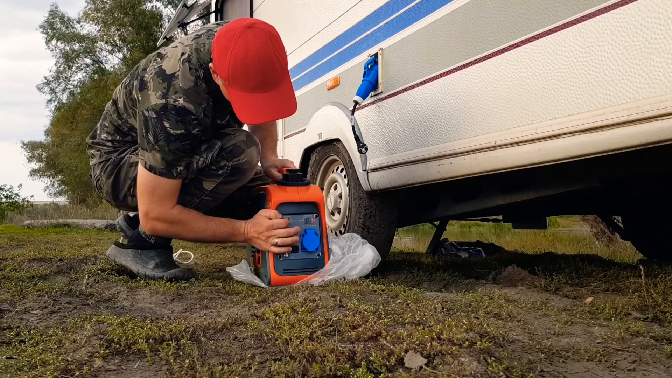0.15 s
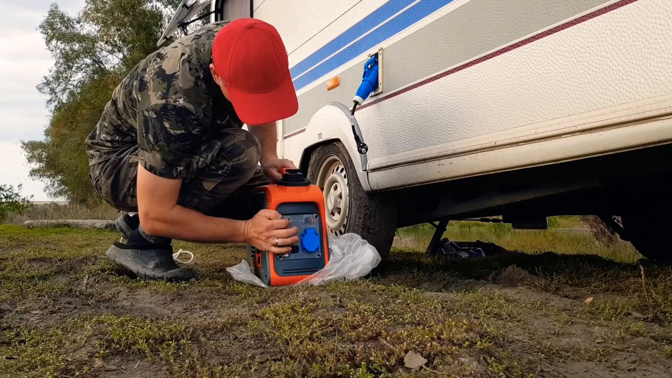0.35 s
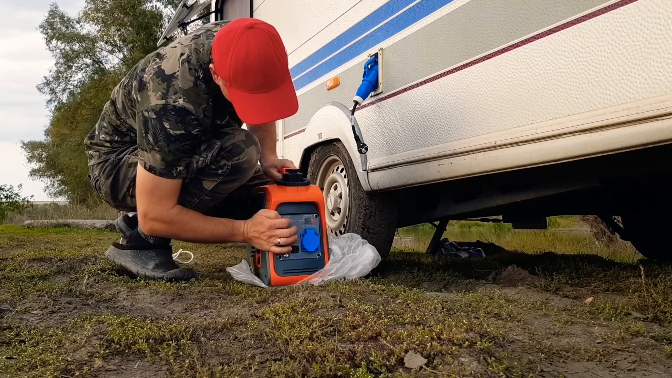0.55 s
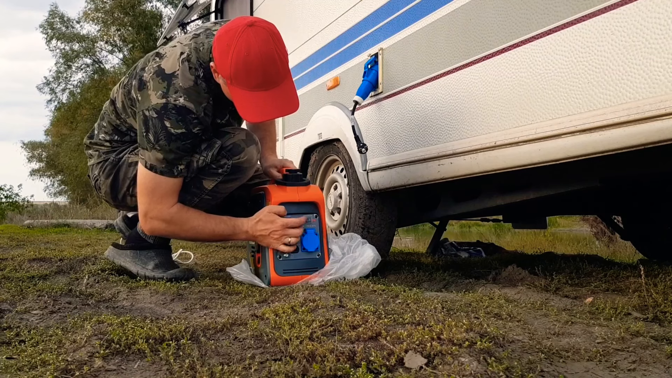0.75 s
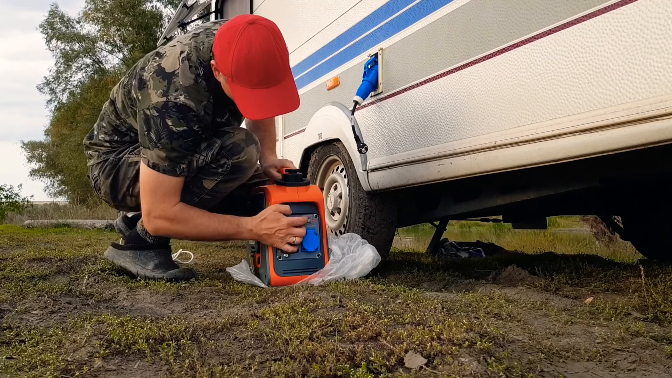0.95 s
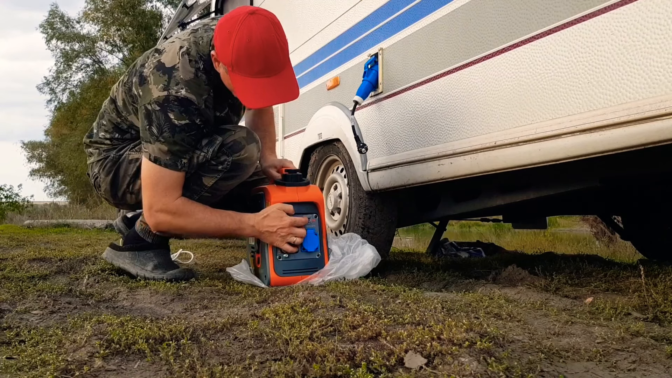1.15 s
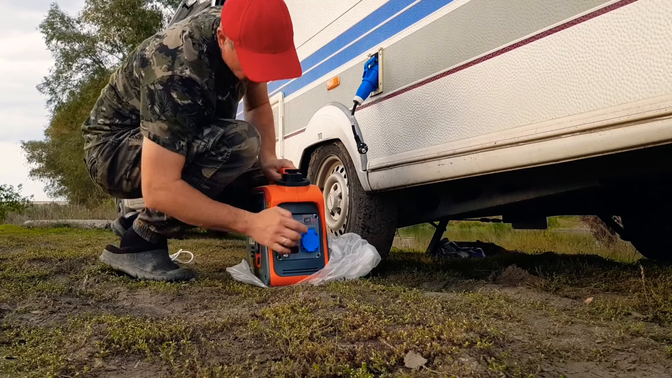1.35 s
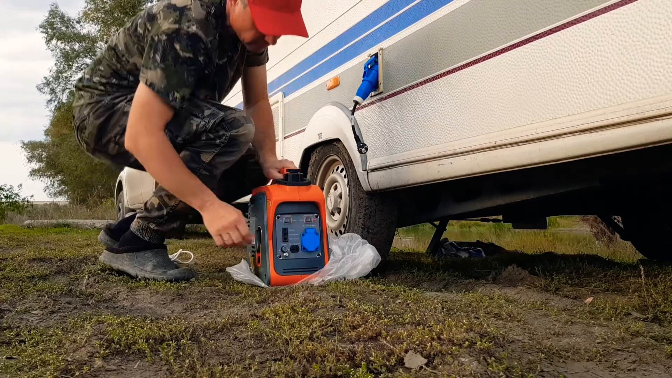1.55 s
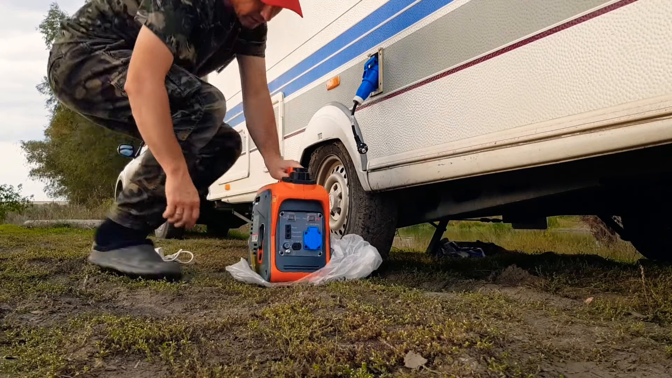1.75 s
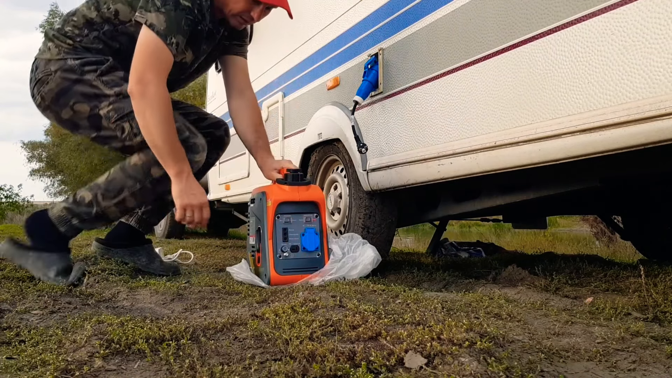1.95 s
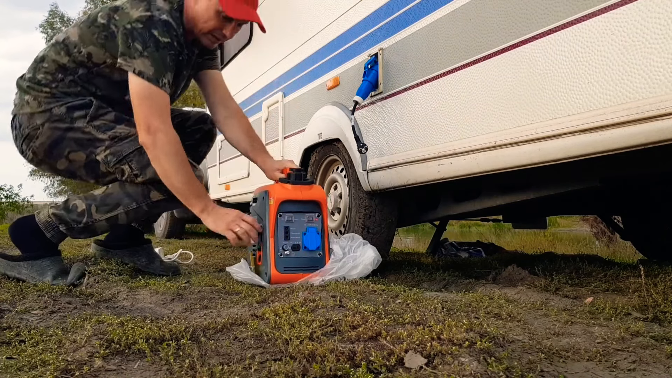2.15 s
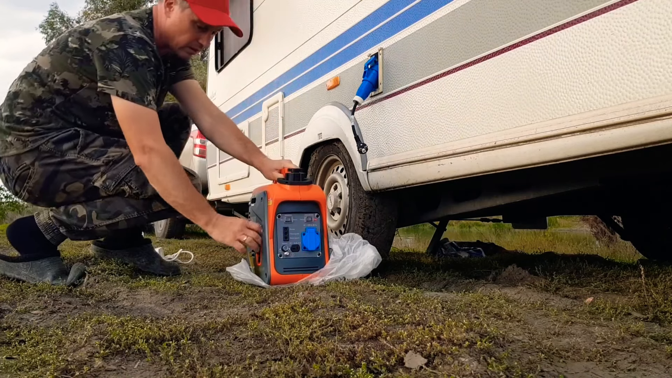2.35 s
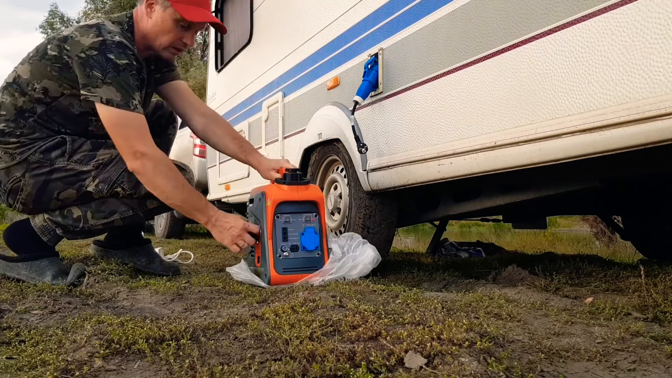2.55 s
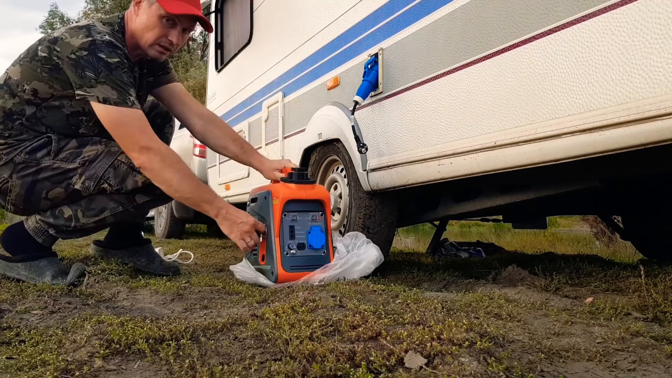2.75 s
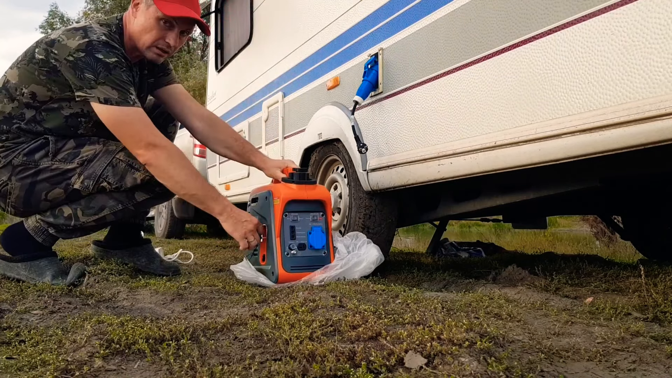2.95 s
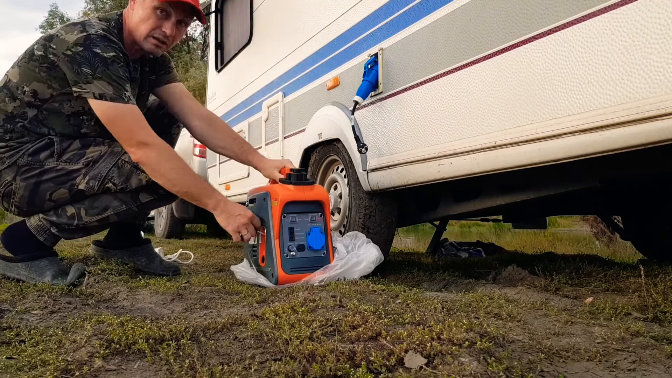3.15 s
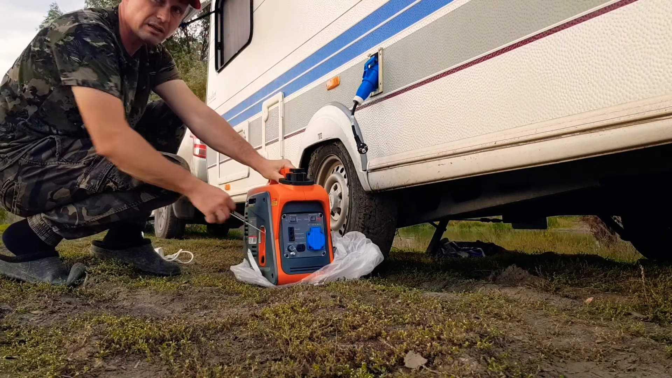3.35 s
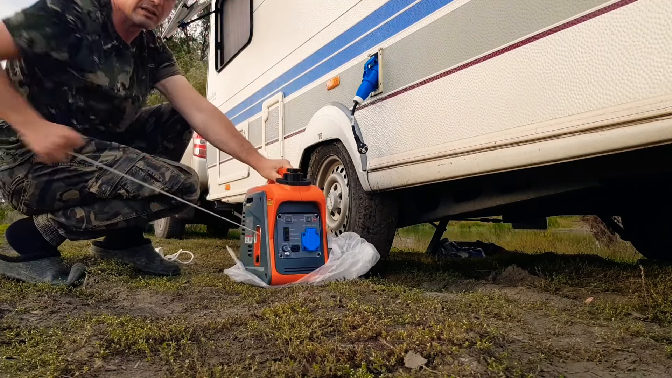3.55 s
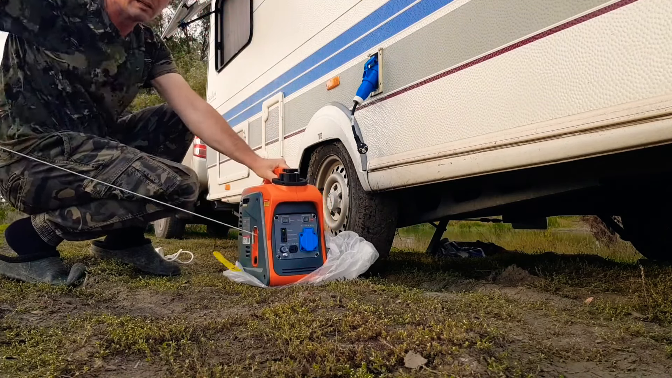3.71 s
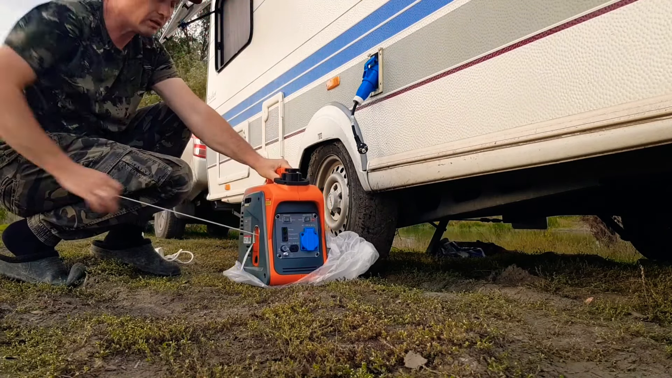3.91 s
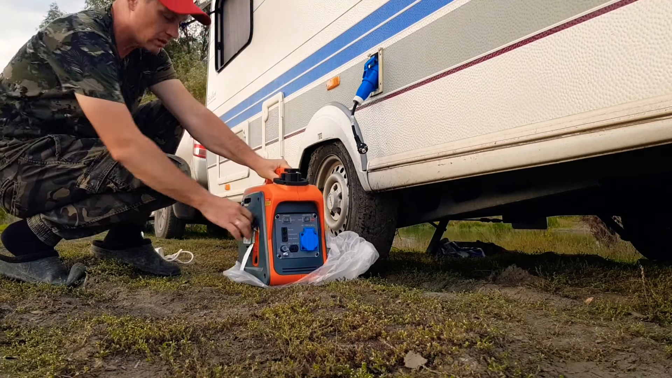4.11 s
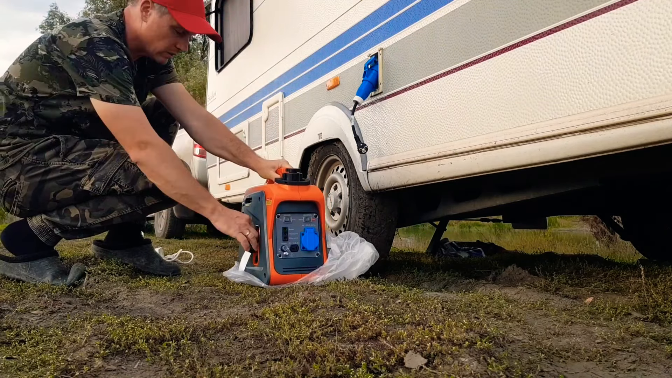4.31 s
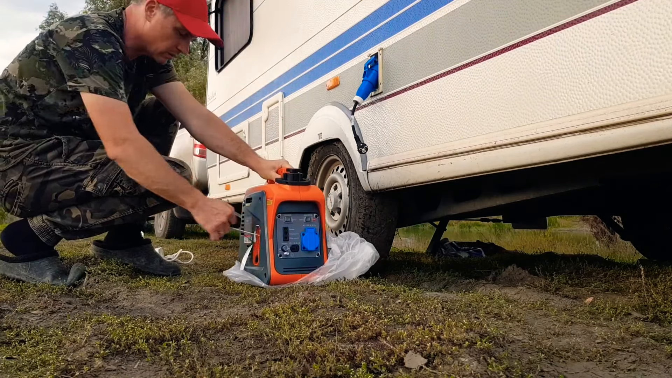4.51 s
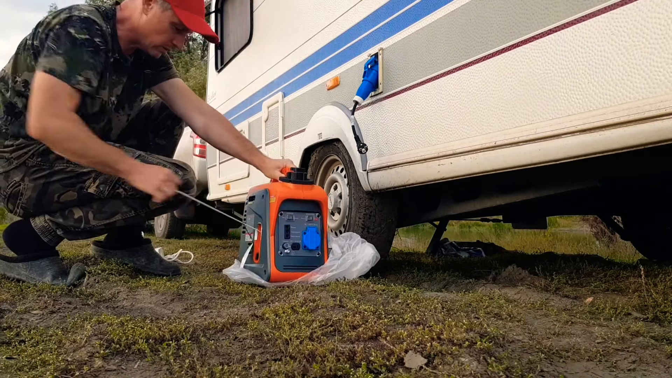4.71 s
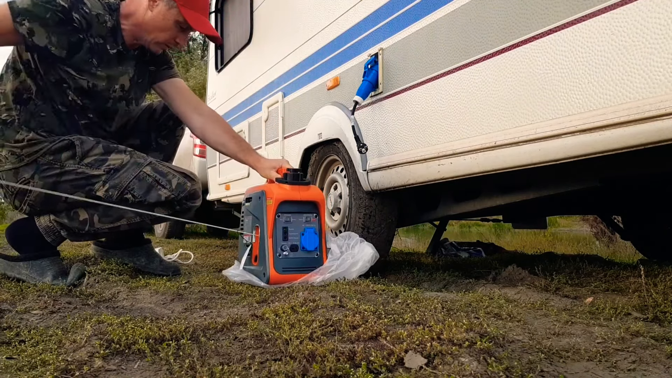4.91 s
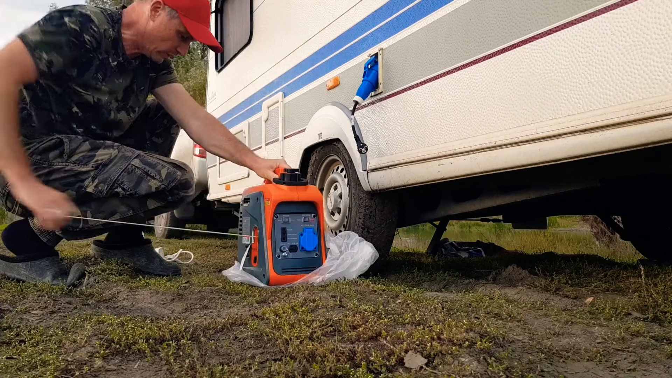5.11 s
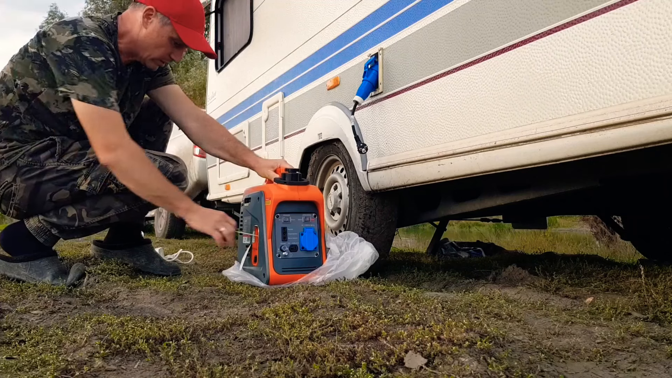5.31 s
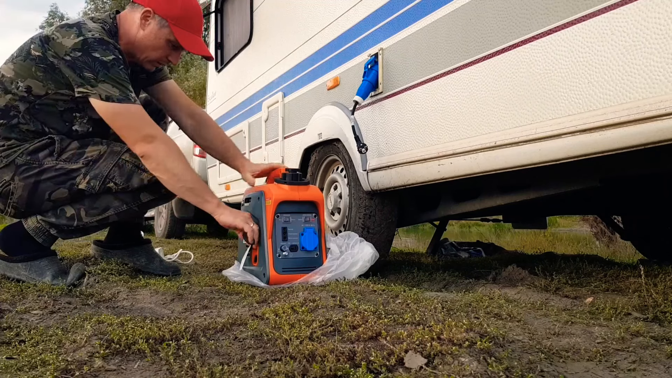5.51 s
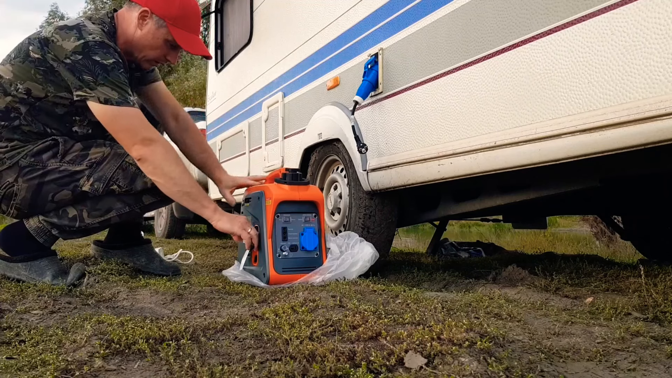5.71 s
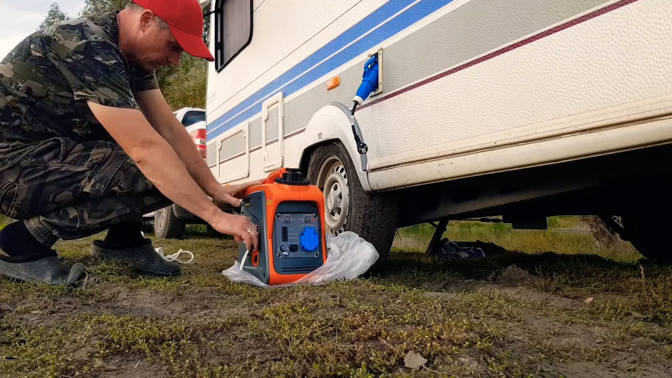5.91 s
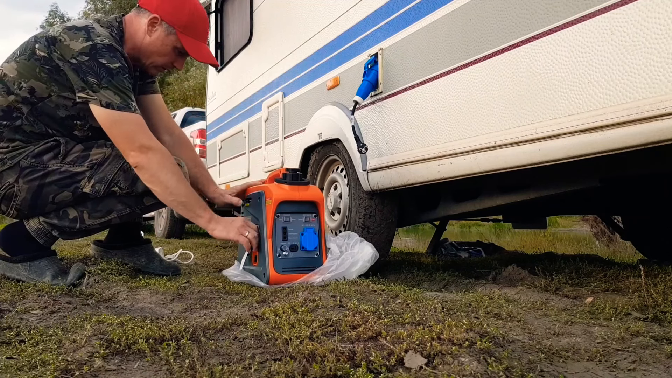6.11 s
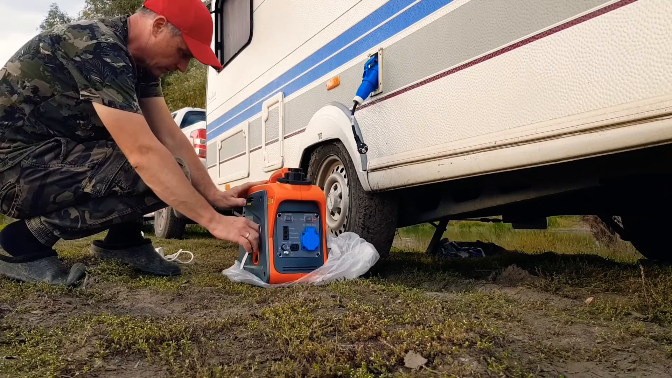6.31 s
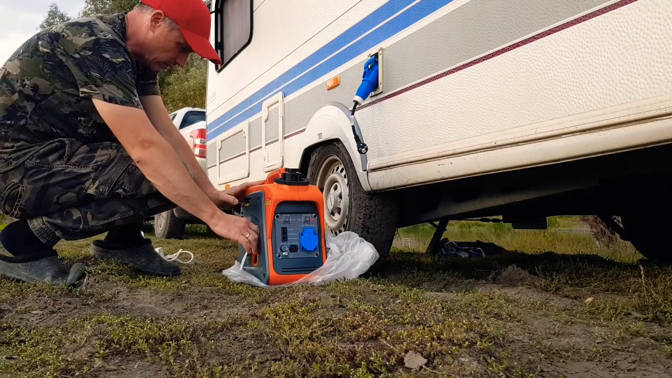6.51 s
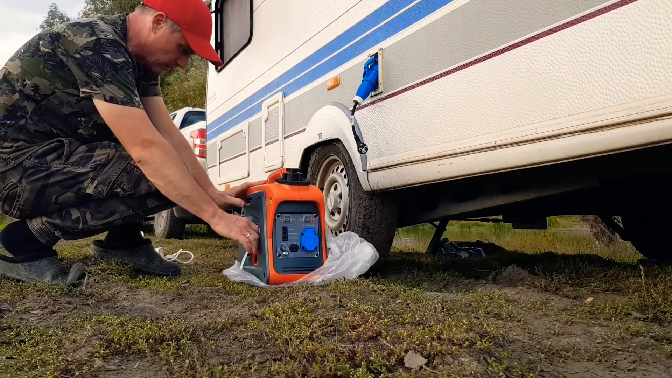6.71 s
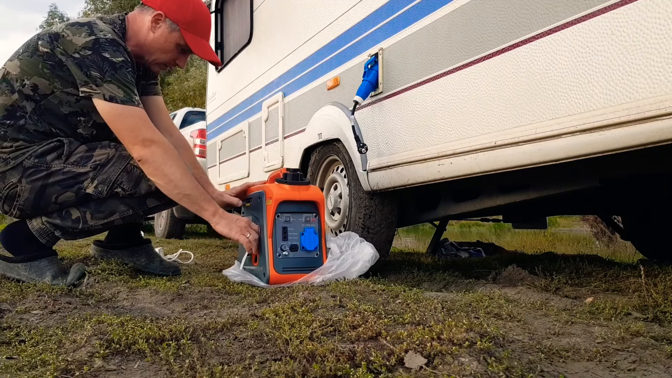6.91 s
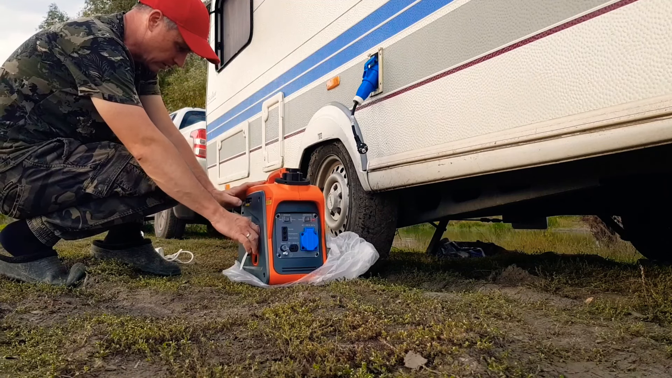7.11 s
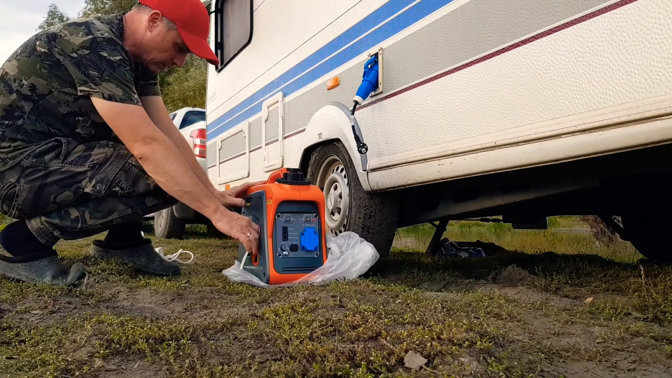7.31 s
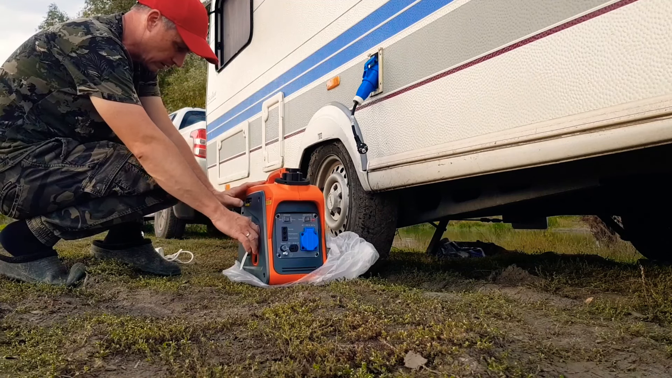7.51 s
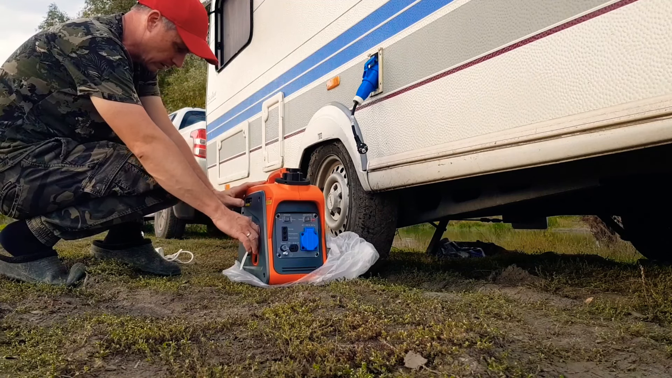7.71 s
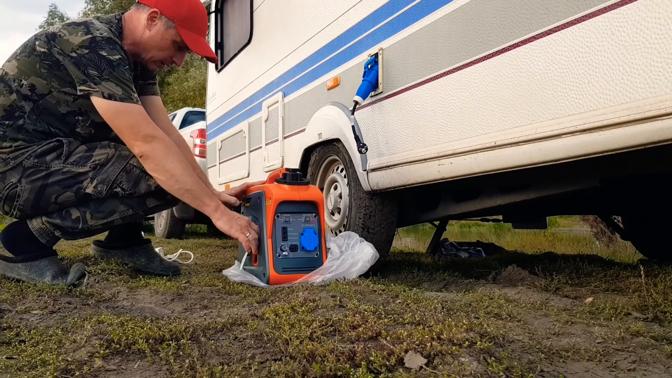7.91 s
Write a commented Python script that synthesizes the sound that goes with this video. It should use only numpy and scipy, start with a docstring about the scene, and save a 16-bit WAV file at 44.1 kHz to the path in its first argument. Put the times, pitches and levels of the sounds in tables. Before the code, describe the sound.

Outdoors beside a caravan, a quiet switch click, clothing rustle and boots scuffing grass lead to handle knocks on a plastic casing. Two hard pulls of a starter cord follow, each a rasping, clattering burst with a whirring rise, falling whine and low engine thuds. The engine does not fire. Afterwards come a knob clack and tiny squeaks. Close stereo, mostly on the right, with little echo.

```python
"""A small plastic-cased generator on grass beside a caravan is pulled twice by its recoil starter and never fires.
Rope hisses as filtered friction clicks, reel and flywheel whine at speed-following pitches, gear chatters as clumped
clicks, and the engine thuds as low noise. A man clicks the switch as a struck casing, rustles his clothes and scuffs
the grass; a knob clacks and thin gliding squeaks follow. Low rumble and faint narrow-band drones lie under it all.
Two microphones hear the scene mostly on the right."""
import sys
import numpy as np
from scipy import signal
from scipy.fft import rfft, irfft
from scipy.io import wavfile

SR = 44100
rng = np.random.default_rng(int(sys.argv[2]) if len(sys.argv) > 2 else 0)


def store_wav(level_fs):
    """Save 16-bit WAV to argv[1]."""
    pcm = np.round(np.clip(np.atleast_2d(level_fs), -1, 1) * 32767)
    wavfile.write(sys.argv[1], SR, pcm.T.astype(np.int16))


N = 350815
TIME = np.arange(N) / SR   # s
# All levels in dB are relative: scene() balances the sources afterwards.


def from_db(db):
    """Logarithmic level: decibels become an amplitude gain."""
    return 10 ** (np.asarray(db) / 20)


def rms_one(x):
    """Normalisation: scale a signal to rms 1."""
    return x / np.sqrt(np.mean(x ** 2) + 1e-20)


def drift(rate):
    """Random modulation: straight lines join random values of spread 1, drawn rate times a second."""
    knots = rng.standard_normal(16000)
    return np.interp(TIME * rate, np.arange(len(knots)), knots) * np.sqrt(3 / 2)


def colour(x, points, tilt_db=0):
    """Minimum-phase filtering through (Hz, dB) points, tilted in dB per octave about 1 kHz."""
    size = 8192
    bin_hz = np.arange(size // 2 + 1) * SR / size
    octave = np.log2(np.maximum(bin_hz, 10) / 1000)
    hz, db = np.transpose(points)
    db = np.interp(octave, np.log2(hz / 1000), db) + tilt_db * np.clip(octave, -1, 3)
    # folding the cepstrum onto positive times makes the filter causal
    cepstrum = irfft(np.log(from_db(db)))
    cepstrum[1:size // 2] *= 2
    cepstrum[size // 2 + 1:] = 0
    response = irfft(np.exp(rfft(cepstrum)))
    return signal.oaconvolve(x, response)[:len(x)]


def noise(points):
    """Spectral shaping: white noise is coloured and set to rms 1."""
    return rms_one(colour(rng.standard_normal(N), points))


def grains(per_s, spread_db):
    """Shot noise: clicks of uneven size and random sign at random times."""
    excess = np.minimum(rng.exponential(1, N), 4)
    sizes = from_db(spread_db * excess) * rng.choice([-1, 1], N)
    return sizes * (rng.random(N) < per_s / SR)


def ringing(x, modes):
    """Modal resonance: a part rings in parallel two-pole resonators of alternating sign."""
    out = 0
    for k, (hz, width, db) in enumerate(modes):
        r = np.exp(-np.pi * width / SR)
        poles = [1, -2 * r * np.cos(2 * np.pi * hz / SR), r * r]
        mode = (1 - r * r) / 2 * signal.lfilter([1, 0, -1], poles, x + 1e-18)
        out = out + (-1) ** k * from_db(db) * mode
    return out


def add(track, s, sound):
    """Superposition: mix a sound into the track at a time."""
    start = max(int(round(s * SR)), 0)
    track[start:start + len(sound)] += sound[:N - start]


def swell(peak, rise, fall, shape):
    """Envelope: 1 at the peak, a tenth one rise before and one fall after; shape 1 is pointed, 2 round."""
    away = np.maximum((peak - TIME) / rise, (TIME - peak) / fall)
    return from_db(-20 * np.minimum(away ** shape, 10))


def gate(start, end, fade):
    """Gating: gain 1 between two times, with linear edges."""
    return np.clip(np.minimum(TIME - start, end - TIME) / fade + .5, 0, 1)


def whine(hz, jitter, flutter_db, octave_db):
    """Rotational tone: phase sums the speed, so pitch follows it, a little unsteadily, with an octave above."""
    phase = 2 * np.pi * np.cumsum(hz * (1 + jitter * drift(500))) / SR
    tone = np.sin(phase) + from_db(octave_db) * np.sin(2 * phase)
    return np.sqrt(2) * from_db(flutter_db * drift(120)) * tone


# faint far-off drones: start_s, end_s, pitch_hz, level_db
DRONES = [(0, 0.3, 374, -71.5), (1.35, 1.74, 215.5, -65), (1.7, 4.86, 106.4, -55.5), (2.6, 7.95, 534, -75),
          (7.15, 7.5, 274, -69)]


def drones(width_hz=30.0):
    """Amplitude modulation: a random complex envelope widens each carrier to a narrow band that swells and fades."""
    out = np.zeros(N)
    for start, end, hz, db in DRONES:
        count = int((end - start) * SR)
        envelope = drift(width_hz) + 1j * drift(width_hz)
        tone = np.real(envelope * np.exp(2j * np.pi * hz * TIME))
        add(out, start, from_db(db) * signal.windows.tukey(count) * rms_one(tone)[:count])
    return out


# spells of low rumble while the man moves about: start_s, length_s, level_db
RUMBLES = [(1.387, .1, -56), (1.7, 3.75, -53.5), (1.828, 0.13, -47.5), (2.45, .06, -50), (5.55, .27, -58),
           (7.48, .5, -57.5)]
BREEZE_DB, RUMBLE_FADE_S = -59.5, .05


def rumble_level(gust_db=0.7, gusts_per_s=4.3):
    """Power addition: a slightly gusty breeze, with louder spells on top."""
    breeze = from_db(BREEZE_DB + gust_db * drift(gusts_per_s))
    spells = sum((from_db(db) * gate(start, start + length, RUMBLE_FADE_S)) ** 2
                 for start, length, db in RUMBLES)
    return np.sqrt(breeze ** 2 + spells)


# spectrum of the low rumble: frequency_hz, density_db (per Hz)
RUMBLE_COLOUR = [(20, -25), (35, -7), (52, 3.5), (75, -1), (110, -7.5), (165, -10), (230, -15.5),
                 (400, -23), (700, -32.5), (2000, -50.5), (8000, -77.5)]


def rumble(level):
    """Low-frequency turbulence: fresh low noise follows the given level."""
    return level * noise(RUMBLE_COLOUR)


# spectrum of the steady background hiss: frequency_hz, density_db (per Hz)
AIR_COLOUR = [(50, 2.5), (300, 10), (700, 5), (1200, 3), (2500, -1), (6000, -6), (9000, -11), (12000, -0.5),
              (15500, 1)]


def air():
    """Uncorrelated noise: each channel has its own steady background hiss."""
    return np.array([noise(AIR_COLOUR), noise(AIR_COLOUR)])


# blows on the casing from switch, handle, pawls and piston: start_s, level_db, tilt_db (per octave), thump_db
KNOCKS = [(1.083, -43, 8, -61), (2.243, -58.5, -6, -68), (2.314, -64, -8, -63), (2.523, -40.5, -1, -51),
          (2.552, -42, -1, -48.5), (2.572, -48.5, -13.5, -50), (2.594, -52, -3, -53),
          (3.27, -66.5, 9.5, -80), (3.361, -48.5, -12, -47), (3.557, -34.5, -17, -33.5),
          (3.586, -38, -1, -35), (3.614, -30, -1.5, -37), (3.648, -31, -5.5, -28.5), (3.671, -39, -4, -43),
          (3.799, -38.5, -3, -44), (3.852, -37.5, -3.5, -40.5), (3.869, -38, -8, -43),
          (3.926, -40.5, -3.5, -46), (3.946, -40.5, -2, -60), (4.045, -49, -2, -56), (4.074, -48, 0, -47),
          (4.129, -49, -4.5, -35), (4.136, -35.5, 2, -33.5), (4.146, -34.5, -3.5, -36),
          (4.558, -36, -10.5, -67), (4.775, -40, -12, -50), (4.812, -38.5, -4, -39),
          (4.838, -40.5, -1.5, -38), (4.935, -38.5, -5, -44), (5.118, -34, -11, -37.5),
          (5.13, -36.5, -9, -36.5), (5.186, -41, -12, -55), (5.303, -42, -14, -37.5),
          (5.4, -57, -19, -40.5), (6.092, -36.5, 0.5, -79), (6.485, -56.5, -15, -50.5),
          (7.036, -71.5, 0, -87), (7.394, -65, -16, -48.5)]
# resonances of the casing: frequency_hz, width_hz, level_db
CASING = [(245, 36, -5), (387.4, 62, -3.5), (474, 45, -2.5), (556, 44, 3), (803, 52, -2), (975, 45, -9.5),
          (1226, 110, -9), (1500, 210, -7.5), (1907, 33, -3.5), (2850, 150, -23), (4533, 110, -24.5)]
# spectrum of a blow's contact noise: frequency_hz, density_db (per Hz)
KNOCK_COLOUR = [(120, -24.5), (300, -13.5), (480, 1), (850, 0), (1300, -2.5), (2100, -6.5), (2900, -16.5),
                (4200, -18.5), (6000, -24.5), (9000, -39.5), (15000, -41.5)]
# spectrum of the heavy low thump: frequency_hz, density_db (per Hz)
THUMP_COLOUR = [(25, -17), (50, 0.5), (75, 3), (140, -2), (210, -10), (280, -10), (600, -32.5),
                (3000, -67.5)]
BUZZ_S = .034   # loose plastic falls 60 dB in this time


def knocks(crack=3.6, ring_db=0.0, thump_t60=0.05, gain_db=0.0):
    """Impact excitation: a crack and a brief plastic buzz ring the casing; heavy blows rock the whole machine."""
    out, t = np.zeros(N), TIME[:8192]
    window = .01 * SR
    for s, db, tilt_db, thump_db in KNOCKS:
        buzz, shove = rng.standard_normal((2, len(t)))
        contact = buzz * from_db(-60 * t / BUZZ_S) + crack * (t == 0)
        body = colour(contact, KNOCK_COLOUR, tilt_db) + from_db(ring_db) * ringing(contact, CASING)
        thump = colour(shove * from_db(-60 * t / thump_t60), THUMP_COLOUR)
        blow = from_db(db + gain_db) * rms_one(body) + from_db(thump_db) * rms_one(thump)
        # each level is the rms of the blow's energy packed into 10 ms
        add(out, s, blow * np.sqrt(window / len(t)))
    return out


# swishes of cloth and rope: peak_s, length_s, hiss_db, sheen_db
SWISHES = [(1.719, 0.21, -60.5, -73), (1.948, 0.34, -65.5, -79), (2.2, 0.3, -76, -92),
           (2.413, 0.15, -82, -97), (2.767, .36, -54.5, -63), (3.042, .26, -65, -76.5),
           (3.255, 0.18, -68.5, -96), (3.453, 0.17, -52, -59), (3.55, 0.15, -55.5, -59.5),
           (3.627, 0.041, -47, -51), (3.682, .1, -55, -53), (4.206, .18, -67.5, -77),
           (4.302, 0.22, -75, -87), (4.823, .3, -67, -68), (4.98, 0.057, -71, -63.5),
           (5.038, 0.023, -53.5, -85), (5.363, 0.32, -70, -79), (6.311, 0.15, -74, -88),
           (6.471, 0.19, -79, -99.5)]
# spectrum of sliding fibres: frequency_hz, density_db (per Hz)
HISS_COLOUR = [(150, -11), (500, 0.5), (1200, -5), (3500, -5), (4900, 1), (6200, -5), (7500, -16.5),
               (10000, -34), (15000, -38.5)]
# spectrum of their top sheen: frequency_hz, density_db (per Hz)
SHEEN_COLOUR = [(5000, -40), (8500, -10.5), (10300, -1), (12500, 0), (15500, -12.5)]
SWISH_RISE_SHARE = 0.53   # part of the length before the peak
ROPE_HISS_DB, ROPE_SHEEN_DB = -23, -43.5   # running rope, relative to the vigour of cranking


def sliding(hiss_db=4.5, sheen_db=-2.5, scratch_db=2.5, shape=1.3):
    """Stick-slip friction: fibres catch and let go by the thousand, all through each pull and in swishes."""
    hiss, sheen = from_db([[ROPE_HISS_DB], [ROPE_SHEEN_DB]]) * cranking()
    for peak, length, db, top_db in SWISHES:
        stroke = swell(peak, SWISH_RISE_SHARE * length, (1 - SWISH_RISE_SHARE) * length, shape)
        hiss = np.hypot(hiss, from_db(db) * stroke)
        sheen = np.hypot(sheen, from_db(top_db) * stroke)
    fibres = grains(9000, 1.3) * from_db(scratch_db * drift(150))
    rasp = from_db(hiss_db) * hiss * rms_one(colour(fibres, HISS_COLOUR))
    return rasp + from_db(sheen_db) * sheen * noise(SHEEN_COLOUR)


# boots scuff the grass: peak_s, crunch_db, thud_db
STEPS = [(1.65, -61, -57), (1.759, -53.5, -60), (1.82, -59, -58), (1.986, -44.5, -48.5),
         (2.036, -52, -44.5)]


def steps(rise_s=0.016, fall_s=0.04, thud_s=0.051):
    """Granular fracture: each scuff is a short crunch of stalks and soil, with a thud in the ground."""
    crunch = sum(from_db(db) * swell(s, rise_s, fall_s, 0.54) for s, db, _ in STEPS)
    thud = sum(from_db(db) * swell(s, 2 * rise_s, thud_s, 1.8) for s, _, db in STEPS)
    stalks = rms_one(colour(grains(3000, 2.3), KNOCK_COLOUR))
    return crunch * stalks + thud * noise(THUMP_COLOUR)


# full pulls of the starter:
# fastest_s, run_up_s, coast_s, stands_s (engine stands this long after fastest), clatter_db, thud_db
PULLS = [(3.62, .26, .6, 0.55, -37, -31), (4.868, 0.2, 0.52, 0.46, -38, -35.5)]
STOP_DB_PER_S = 119.5   # extra decay once the engine stands
THUD_LAG_S, THUD_RISE_S, THUD_FALL_S = 0.023, 0.2, 0.55   # hardest just after the fastest moment


def cranking():
    """Driven and damped rotation: each pull runs up, coasts down, and settles fast when the engine stands."""
    return sum(swell(peak, run_up, coast, 1.97)
               * from_db(db - STOP_DB_PER_S * np.maximum(TIME - peak - stands, 0))
               for peak, run_up, coast, stands, db, _ in PULLS)


def thudding():
    """Low-frequency radiation: the cranked engine pumps air and shakes on the ground."""
    gain = sum(from_db(db) * swell(peak + THUD_LAG_S, THUD_RISE_S, THUD_FALL_S, 0.85)
               for peak, *_, db in PULLS)
    return gain * noise(THUMP_COLOUR)


# spectrum of the chattering gear: frequency_hz, density_db (per Hz)
CLATTER_COLOUR = [(100, -16.5), (220, -10.5), (420, -0.5), (700, -2), (950, -14), (1800, -12), (2600, -16),
                  (5000, -24.5), (8000, -39), (15000, -52.5)]
# thin ringing of the steel recoil spring: frequency_hz, width_hz, level_db
SPRING = [(2860, 33, -13), (4180, 12, -4.5), (4829, 22, -17), (10200, 16, -29.5)]


def clatter(per_s=1500, spread_db=3.0, lump_db=2.0, burst_db=1.5, ring_db=4.0, spring_db=1.5,
            gain_db=-3.0, rattle_per_s=55, rattle_db=14):
    """Repeated impacts: pawls, rope and valve gear chatter in clumps with harder rattles, ringing shell and spring."""
    clumps = from_db(lump_db * drift(160) + burst_db * drift(55))

    def chatter():
        """Superposed shot noise: clumped clicks and sparser, harder rattles."""
        return clumps * grains(per_s, spread_db) + from_db(rattle_db) * grains(rattle_per_s, 1)

    dry, struck = chatter(), chatter()
    shell = from_db(ring_db) * ringing(struck, CASING)
    spring = from_db(spring_db) * ringing(struck, SPRING)
    body = colour(dry, CLATTER_COLOUR) + shell + spring
    return from_db(gain_db) * cranking() * rms_one(body)


# runs of the rope reel, speeding up and slowing at the same rate:
# fastest_s, run_up_s, run_down_s, start_hz, top_hz, level_db
REEL_RUNS = [(3.54, .125, 0.0198, 1157, 2304, -49.5), (4.57, 0.11, 0.016, 520, 670, -60),
             (4.86, .22, .07, 640, 3413, -57.5), (5.11, 0.092, 0.13, 2220, 2976, -58.5)]


def reel(fade_s=.045):
    """Speed-dependent radiation: the reel whirs roughly up to top speed and down, louder the faster it turns."""
    out = 0
    for fastest, run_up, run_down, start_hz, top_hz, db in REEL_RUNS:
        hz = np.maximum(top_hz - (top_hz - start_hz) * np.abs(TIME - fastest) / run_up, 0)
        running = gate(fastest - run_up + fade_s / 2, fastest + run_down, fade_s)
        gain = from_db(db) * (hz / top_hz) ** .3 * running
        out = out + gain * whine(hz, jitter=.032, flutter_db=4.0, octave_db=-24)
    return out


# the rope drives the flywheel, then lets it coast: let_go_s, coast_s, pitch_hz, level_db, sing_s
SPINS = [(3.565, 0.081, 1320, -38, 0.063), (3.723, 0.39, 1331, -40, .12), (4.9, 0.372, 1191, -54.5, 0.18)]
SAG_HZ_PER_S = 2200   # friction slows the flywheel evenly
COAST_DB, COAST_DB_PER_S = -52, 17   # faint coasting whine and its decay


def flywheel(loudest_after_s=0.0209, fade_s=.03):
    """Frictional slowing: the fan holds its pitch while driven, sings as the rope lets go, then sinks and fades."""
    out = 0
    for let_go, coasts, top_hz, db, sings in SPINS:
        coasted = np.maximum(TIME - let_go, 0)
        singing = from_db(db) * swell(let_go + loudest_after_s, sings / 2, sings, 1.3)
        turning = gate(let_go - sings / 2, let_go + coasts, fade_s)
        coasting = from_db(COAST_DB - COAST_DB_PER_S * coasted) * turning
        tone = whine(top_hz - SAG_HZ_PER_S * coasted, jitter=0.012, flutter_db=4.0, octave_db=-27.5)
        out = out + (singing + coasting) * tone
    return out


# thin squeaks: start_s, length_s, start_hz, end_hz, level_db, octave_db
SQUEAKS = [(6.453, 0.0416, 1880, 1600, -53.5, -35), (6.894, 0.02, 2900, 3170, -71, -30),
           (6.903, 0.052, 2600, 2400, -65, -7.5), (6.93, 0.066, 1715, 1400, -71, -24),
           (6.47, 0.026, 2250, 2330, -67, -30), (7.34, 0.029, 1640, 1800, -68.5, -30),
           (7.735, 0.027, 2700, 3500, -78, -30), (7.347, 0.0573, 2200, 2620, -62, -13.5),
           (7.734, 0.074, 2370, 2230, -70, -10.5)]


def squeaks(jitter, gain_db):
    """Frequency modulation: short gliding tones have a wavering pitch and an octave above."""
    out, waver = np.zeros(N), 1 + jitter * drift(400)
    for s, length, start_hz, end_hz, db, octave_db in SQUEAKS:
        count = int(length * SR)
        hz = np.linspace(start_hz, end_hz, count) * waver[int(s * SR):][:count]
        phase = 2 * np.pi * np.cumsum(hz) / SR
        tone = np.sin(phase) + from_db(octave_db) * np.sin(2 * phase)
        add(out, s, from_db(db + gain_db) * np.sqrt(2) * np.hanning(count) * tone)
    return out


def scatter(x, t60):
    """Diffuse reverberation: dense, dying reflections from ground and caravan wall, at unit energy."""
    t = TIME[:12000]
    tail = rng.standard_normal(len(t)) * from_db(-60 * t / t60)
    return signal.oaconvolve(x, tail / np.linalg.norm(tail))[:N]


# response of the direct path to the shaded left microphone: frequency_hz, level_db
LEFT_DIRECT = [(60, -15.5), (150, -19), (400, -16), (1200, -16), (1800, -20.5), (2800, -28), (6400, -35),
               (9500, -6.5), (15000, -8.5)]
# response of the other paths to the left microphone: frequency_hz, level_db
LEFT_SCATTER = [(100, -25.5), (400, -20), (1200, -14.5), (2000, -20.5), (4200, -25.5), (6400, -27),
                (9500, 5.5), (12000, -2), (15000, -3.5)]
PORT_LAG_S = .00009   # sound reaches the left microphone first


def scene(rumble_db=-0.5, thud_db=-3.0, gust_db=-23.5, air_db=-73.5, mix_db=3.5, wet_db=-8.5,
          yard_t60=0.14, squeak_wet_db=-5.5, machine_left_db=1.5, around_left_db=-5.5):
    """Acoustic shadowing: the right microphone is open; the left gets treble by other paths, with its own fine grain."""
    machine = clatter() + flywheel() + reel() + knocks()
    machine = machine + from_db(wet_db) * scatter(machine, yard_t60) + from_db(thud_db) * thudding()
    chirps = squeaks(jitter=0.029, gain_db=0.5)
    chirps = chirps + from_db(squeak_wet_db) * scatter(chirps, yard_t60)
    level = from_db(rumble_db) * rumble_level()
    around = chirps + sliding() + steps() + drones() + rumble(level)
    left = colour(from_db(machine_left_db) * machine + from_db(around_left_db) * around, LEFT_DIRECT)
    left = left + colour(clatter() + knocks() + sliding(), LEFT_SCATTER)
    left = left + from_db(gust_db) * rumble(level)   # the breeze on its own port
    right = np.interp(TIME - PORT_LAG_S, TIME, machine + around)
    return from_db(mix_db) * np.array([left, right]) + from_db(air_db) * air()


# response of the two microphone ports: frequency_hz, level_db
PORT_COLOUR = [(6000, -0.5), (7000, -3.5), (8100, -11), (9300, -0.5), (10300, -1)]
CUTOFF_HZ = 15750


def record(dry):
    """Band limiting: the microphone ports notch the treble and a steep low-pass filter cuts the top."""
    ported = np.array([colour(channel, PORT_COLOUR) for channel in dry])
    low_pass = signal.ellip(12, .1, 80, CUTOFF_HZ, fs=SR, output="sos")
    return signal.sosfilt(low_pass, ported)


dry = scene()
out = record(dry)
store_wav(out)
```